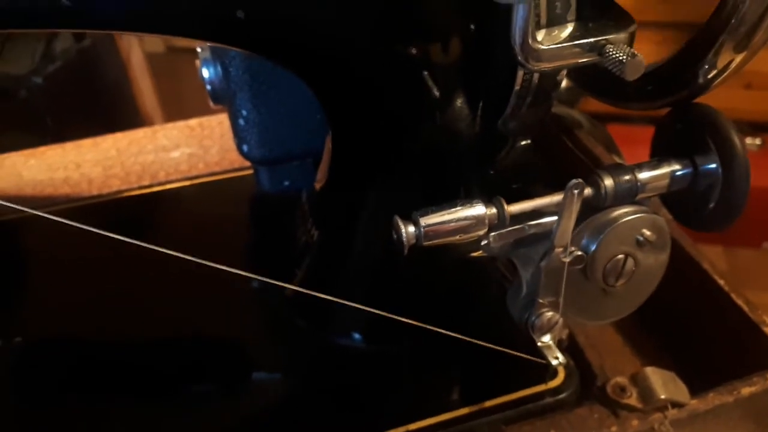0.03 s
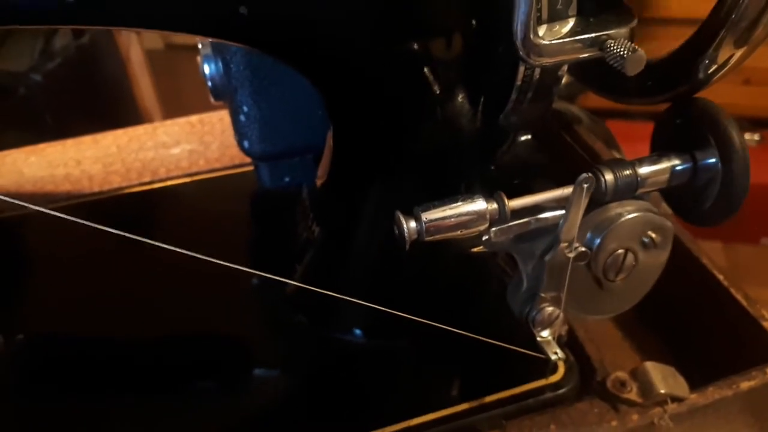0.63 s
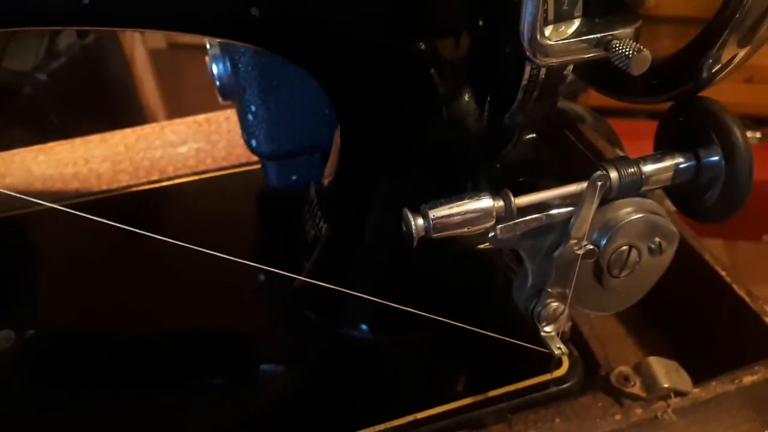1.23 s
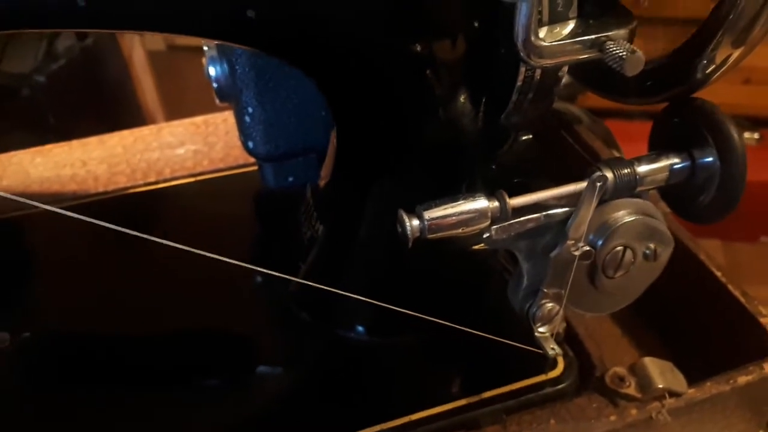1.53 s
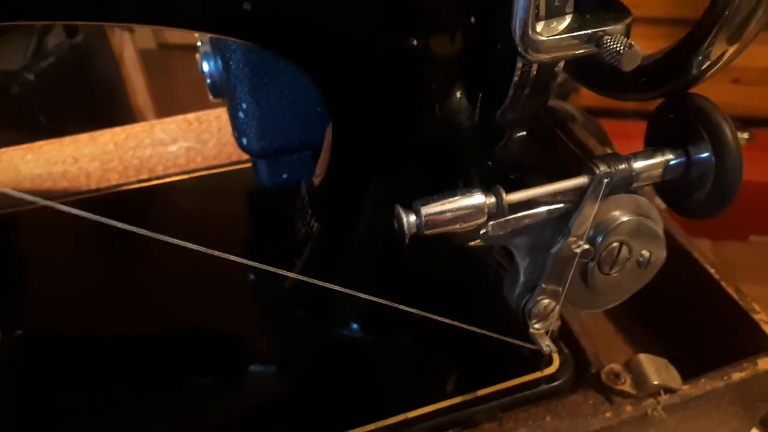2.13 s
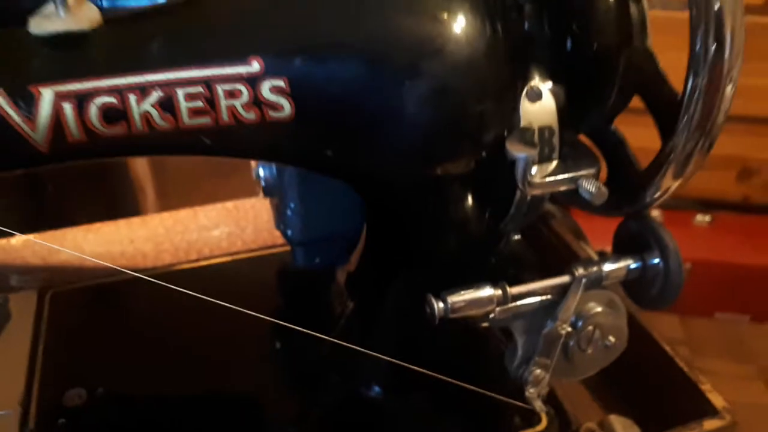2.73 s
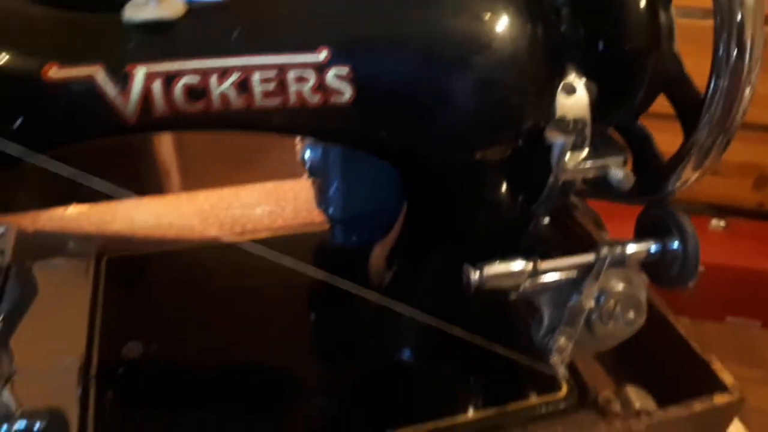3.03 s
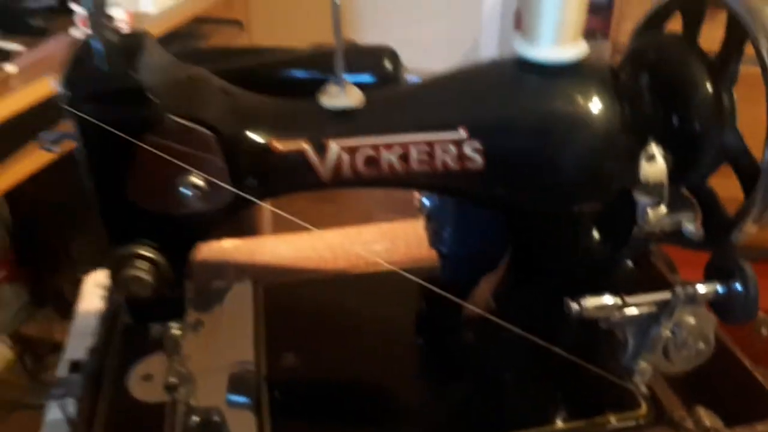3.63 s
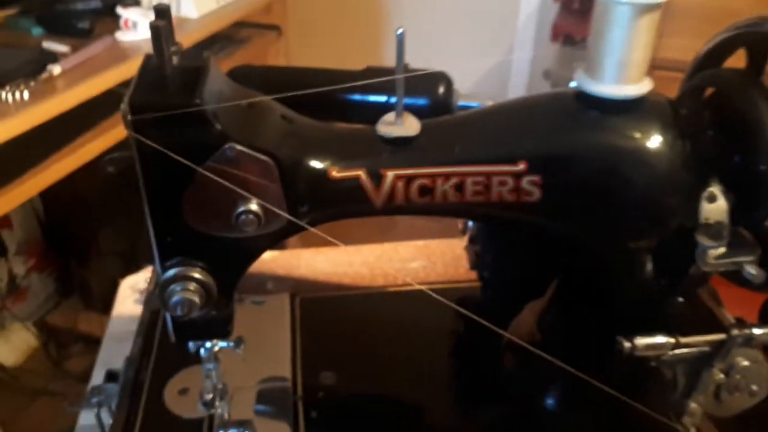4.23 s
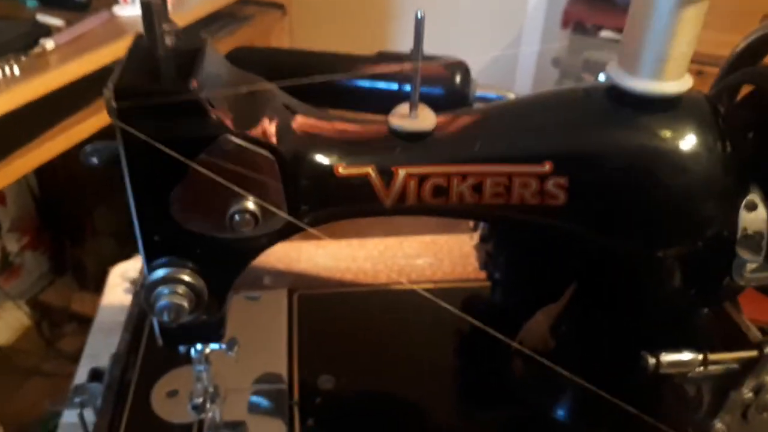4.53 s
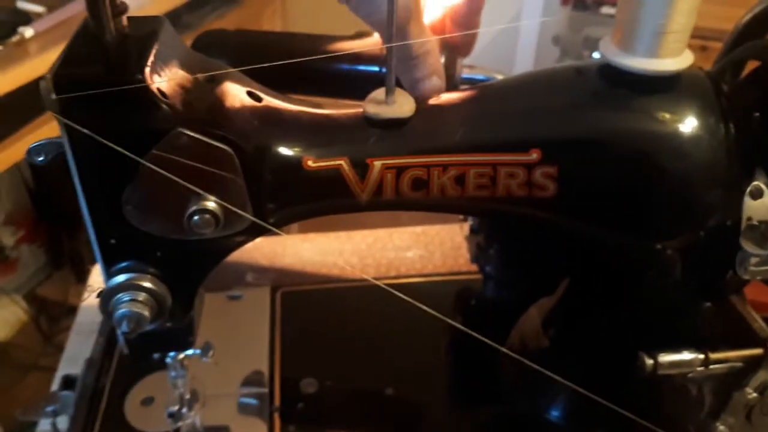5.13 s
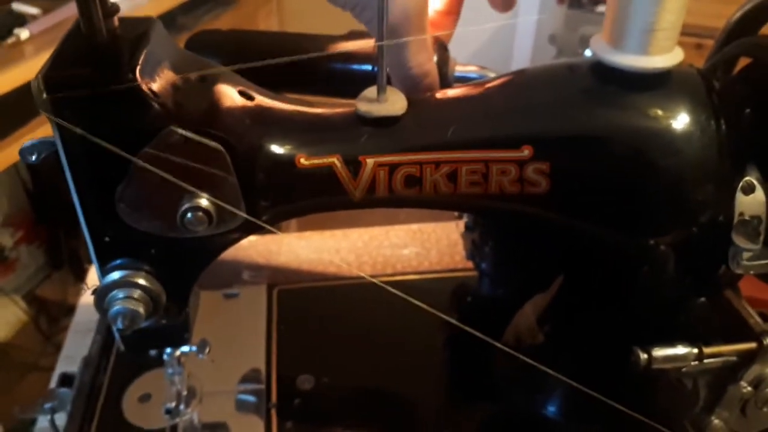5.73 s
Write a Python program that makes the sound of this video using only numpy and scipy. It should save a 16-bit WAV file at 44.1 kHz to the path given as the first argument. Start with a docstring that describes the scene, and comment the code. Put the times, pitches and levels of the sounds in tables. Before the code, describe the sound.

From the start, a hand-cranked sewing machine is winding a bobbin, loud and close, slightly to the left. Its gears whirr with dense, fine ticking, loose links snap and rattle, and a steel part clacks about three times a second. Beneath this, the wooden base rumbles and drones with each turn. At about 2.5 seconds the mechanism stops, and a metal part drops into place with a clink and one small bounce. The rest is much quieter and a little further off. A light tick comes near 3.2 seconds, a hard knock at 3.4, and a hollow knock with a brief low ring around 3.75. Faint handling ticks follow between 4.5 and 4.7 seconds, then two sharper little clicks near 5.1 and 5.4. The small room's soft hush and low hum continue until the end, at around six seconds.

```python
"""First comes the whirr and rattle of a hand-cranked sewing machine winding a bobbin close by.
Gear teeth tick into the metal body, loose links snap against their stops, a steel part clacks
once a turn and the wooden base drones. After about 2.5 seconds it stops with a clink.
A few knocks and small handling ticks follow in a small, quiet room with a low hum."""
import sys
import numpy as np
from scipy import signal
from scipy.fft import rfft, irfft, next_fast_len
from scipy.io import wavfile
from scipy.ndimage import uniform_filter1d, map_coordinates

SR = 44100
rng = np.random.default_rng(int(sys.argv[2]) if len(sys.argv) > 2 else 0)


def materialize(psi):
    """Save the field psi as 16-bit PCM at rate SR to the path in sys.argv[1].

    A 1-D psi becomes a single channel; in a 2-D psi each row is a channel.
    """
    bounded = np.clip(np.atleast_2d(psi).T, -1, 1)
    quanta = np.round(bounded * 32767).astype(np.int16)
    wavfile.write(sys.argv[1], SR, quanta)


N = 254456
NOW = np.arange(N) / SR  # seconds
TOP_HZ = 15850


def amp(db):
    """Turn decibels (dB) into a gain. A fade time, t60, is the seconds taken to fall 60 dB."""
    return 10 ** (np.asarray(db) / 20)


def unit(x):
    """Scale to an average power of 1."""
    return x / np.sqrt(np.mean(np.abs(x) ** 2) + 1e-20)


def along(points, hz):
    """Read between (Hz, value) points on a log frequency axis."""
    f, values = np.transpose(points)
    return np.interp(np.log(hz + 1), np.log(f + 1), values)


def curve(points):
    """Join (seconds, value) points into one value per sample."""
    return np.interp(NOW, *np.transpose(points))


def wobble(rate):
    """A smooth curve through `rate` random values a second."""
    return map_coordinates(rng.standard_normal(int(N * rate / SR) + 4), [NOW * rate])


def grid():
    """The frequencies that all filters share."""
    return np.fft.rfftfreq(2 * next_fast_len(N // 2 + SR // 4), 1 / SR)


def filtered(x, response):
    """Pass x through a filter given on the frequency grid."""
    size = 2 * (response.shape[-1] - 1)
    return irfft(rfft(x, size) * response)[..., :N]


def colour(spectrum):
    """A filter shaped by (Hz, dB) points."""
    cepstrum = irfft(np.log(amp(along(spectrum, grid())) + 1e-6))
    half = len(cepstrum) // 2
    cepstrum[1:half] *= 2  # folded forward, so nothing sounds before the hit
    cepstrum[half + 1:] = 0
    return unit(np.exp(rfft(cepstrum)))


def resonances(modes):
    """A filter that rings at (Hz, width in Hz, dB) modes; small bodies give off no deep bass."""
    f = grid()
    peaks = sum((-1) ** k * amp(db) * width / (hz * hz - f * f + 1j * f * width)
                for k, (hz, width, db) in enumerate(modes))
    bass_cut = (1j * f / (1j * f + 100)) ** 3
    return unit(1j * f * peaks * bass_cut)


def noise():
    """Two unrelated white noises."""
    return rng.standard_normal((2, N))


def burst(t60, rise=0.00014):
    """The short scrape of one contact."""
    t = np.arange(SR // 3) / SR
    return rng.standard_normal((2, len(t))) * amp(-60 * t / t60) * (1 - np.exp(-t / rise))


def ring(modes):
    """Struck metal: each blow shares its strength a little differently among the tones."""
    t = np.arange(SR // 2) / SR
    tones = 0
    for hz, db, t60 in modes:
        fade = amp(db + rng.uniform(-2, 2) - 60 * t / t60)
        tones += fade * np.sin(2 * np.pi * (hz * t + rng.random((2, 1))))
    return tones * (1 - np.exp(-t / 0.00021))


def waver(hz, spread_hz, depth_db):
    """A low resonance kept going by uneven shaking: its pitch and level stray."""
    phase = 2 * np.pi * np.cumsum(hz + spread_hz * wobble(45)) / SR
    return unit(amp(depth_db * wobble(40)) * np.sin(phase))


def add(track, s, sound):
    """Mix a sound in at s seconds."""
    start = max(round(s * SR), 0)
    track[:, start:start + sound.shape[1]] += sound[:, :N - start]


# How long the room echoes. Each row: frequency in Hz, fade time in seconds.
ROOM_FADE = [(150, 0.32), (1000, 0.2), (4000, 0.24), (14000, 0.14)]

def room(x, wet_db):
    """The direct sound plus the walls' short, diffuse echo."""
    echo = np.zeros((2, N))
    step = SR // 4  # a new random echo every quarter second
    for start in range(0, N, step):
        part = x[:, start:start + step]
        if np.abs(part).max() > 1e-5:
            hz, t, bands = signal.stft(rng.standard_normal((2, SR // 3)), SR, nperseg=256)
            fade = amp(-60 * t / along(ROOM_FADE, hz)[:, None]) * (1 - np.exp(-t / 0.0036))
            tail = signal.istft(bands * fade, SR, nperseg=256)[1]
            add(echo, start / SR, signal.fftconvolve(part, tail / np.linalg.norm(tail[0]), axes=1))
    return (x + amp(wet_db) * echo) / np.hypot(1, amp(wet_db))


# How alike left and right sound. Each row: frequency in Hz, likeness from 0 to 1.
LIKENESS = [(130, 0.5), (290, 0.86), (640, 0.6), (1410, 0.06), (3100, 0)]

def stereo(pair, balance):
    """Two microphone openings: alike in the bass, the right one shaded in the treble."""
    f = grid()
    angle = np.arccos(np.clip(along(LIKENESS, f), -1, 1)) / 2
    mid, side = filtered(pair, np.array([np.cos(angle), np.sin(angle)]))
    gains = amp(along(balance, f) * np.array([[.5], [-.5]]))
    gains /= np.sqrt(np.mean(gains ** 2, axis=0))
    return filtered(np.array([mid + side, mid - side]), gains)


# Faint tones. Each row: start and hold in seconds, pitch in Hz, level in dB, fade time in seconds.
LOW_TONES = [(2.641, 0.14, 359.4, -59, 0.91), (2.85, .35, 238, -78, 0.41), (3.52, .85, 291, -77.5, 1),
             (3.84, .33, 294.6, -62, .2)]

def low_tones(rise_s=.11):
    """Faint low tones swell, hold and fade."""
    track = np.zeros(N)
    for start, held, hz, db, t60 in LOW_TONES:
        t = NOW - start
        swell = np.clip(t / rise_s, 0, 1) * amp(db - 60 * np.maximum(t - held, 0) / t60)
        track += np.sqrt(2) * swell * np.sin(2 * np.pi * hz * t)
    return track


# The hush of the room. Each row: frequency in Hz, relative level in dB.
AIR_COLOUR = [(15, -37), (28, -25), (60, -12), (90, -9.5), (125, -3), (180, -10.5), (260, -17.5),
              (400, -16.5), (660, -20), (900, -23), (2760, -30), (4500, -33.5), (10000, -37), (15500, -32)]

def background():
    """Room air, faint tones and a wavering low hum that recedes."""
    hum = amp(curve([(3.3, -69), (5.7, -72)])) * waver(hz=119.5, spread_hz=3, depth_db=3.5)
    air = stereo(filtered(noise(), colour(AIR_COLOUR)), balance=[(100, 1), (10000, 1.5)])
    return low_tones() + hum + amp(-67.5) * air


# Handling ticks. Each row: start in seconds, level in dB, pitch in Hz, width in octaves,
# rise and fade times in seconds.
TOUCHES = [(3.149, -60, 2800, 0.5, 0.004, 0.046), (3.25, -38.5, 3770, 0.6, 0.0041, 0.049),
           (4.481, -65.5, 375, 0.11, 0.0066, 0.18), (4.56, -51, 66, 0.3, 0.004, 0.069),
           (4.616, -63, 2030, 0.92, 0.0016, 0.06), (4.669, -53.5, 1980, 0.17, 0.023, 0.25),
           (4.724, -51, 4820, 0.63, 0.00091, 0.039), (5.03, -66, 3200, 0.66, 0.0018, .05),
           (5.126, -39.5, 4240, 0.6, 0.00064, 0.036), (5.128, -63, 1050, 0.32, .001, 0.047),
           (5.35, -54.5, 1190, 1, 0.0047, 0.085), (5.37, -37, 1960, 0.44, 0.00068, 0.014)]

def ticks():
    """Light touches on thread and fittings, each with one broad resonance, heard mostly off the walls."""
    track = np.zeros((2, N))
    for s, db, hz, octaves, rise, t60 in TOUCHES:
        touch = rfft(burst(t60, rise))
        off_pitch = np.log2(np.linspace(1, SR / 2, touch.shape[1]) / hz) / octaves
        peak = unit(1 / (1 + off_pitch ** 2))
        add(track, s, amp(db) * irfft(touch * peak)[:, :SR // 4])
    return room(track, wet_db=7.5)


# Knocks on machine and case. Each row: start in seconds, crack and thump in dB, fade time in seconds.
KNOCK_HITS = [(3.4402, -30.5, -37, 0.0374), (3.452, -33.5, -51, 0.023), (3.695, -46.5, -45.5, 0.13),
              (3.749, -39.5, -30.5, 0.046), (3.768, -53.5, -44, 0.064)]
# The crack of a knock. Each row: frequency in Hz, relative level in dB.
CRACK_COLOUR = [(150, -29), (250, -15), (400, -17), (550, -12.5), (780, -15.5), (1180, -16.5), (1700, -12),
                (2000, -16), (3300, -23), (4700, -21.5), (5500, -25.5), (8200, -20), (10500, -27),
                (15500, -23.5)]
# The hollow wooden case. Each row: pitch in Hz, width in Hz, relative level in dB.
CASE_MODES = [(155, 20, 9.5), (232, 75, -5), (313, 46, -4), (454, 19, -3.5), (530, 44, -8), (775, 61, -10)]

def knocks():
    """Hard knocks with a hollow thump from the case; the heaviest leaves a low ring."""
    cracks, thumps, rings = np.zeros((3, 2, N))
    for s, db, thump_db, t60 in KNOCK_HITS:
        add(cracks, s, amp(db + 4) * burst(t60, rise=0.0013))
        add(thumps, s, amp(thump_db) * burst(t60))
    add(rings, 3.752, ring([(235, -46.5, 0.96), (4544, -54, .25)]))
    cracks = room(filtered(cracks, colour(CRACK_COLOUR)), wet_db=6.5)
    thumps = room(filtered(thumps, resonances(CASE_MODES)), wet_db=-1.5)
    return cracks + thumps + rings


# The ring of the falling part. Each row: pitch in Hz, relative level in dB, fade time in seconds.
CLINK_TONES = [(910, 3.5, 0.13), (1015, -16, 0.19), (1287, 1, 0.19), (2430, -13, 0.18), (2420, -2, 0.15),
               (3120, -10, 0.26), (4060, -3.5, 0.16), (4380, -9, 0.15), (5170, -11, 0.22), (5960, -15, .16)]
# The noise of its landing. Each row: frequency in Hz, relative level in dB.
LANDING_COLOUR = [(350, -16), (600, -19), (869, -8.5), (970, -1), (1070, -4.5), (1680, -17), (2370, -8.5),
                  (2610, -18.5), (4220, -12.5), (4780, -21.5), (5190, -20.5), (14900, -31.5),
                  (16000, -44.5)]

def clink():
    """A metal part drops into place as the wheel comes to rest, and bounces once."""
    contact, metal = np.zeros((2, 2, N))
    for s, db in [(2.492, -30), (2.524, -37)]:
        add(contact, s, amp(db) * burst(t60=0.061))
        add(metal, s, amp(db - 9.5) * ring(CLINK_TONES))
    return room(filtered(contact, colour(LANDING_COLOUR)), wet_db=8.5) + metal


# Turns of the crank, the first already under way. Each row: start in seconds, then clack, thud, steel
# ring, jingle, link rattle and base shaking in dB, then the links' delay at mid-turn in seconds.
CRANK_TURNS = [(-.19, -21, -29, -36, -47, -2, -1, 0.0004), (.127, -21, -26, -29, -46, -2, -1.5, -0.0036),
               (0.4492, -20, -35, -37, -50.5, 0.5, -0.5, -0.0016),
               (0.7619, -21.5, -26, -36.5, -55, -1.5, -1.5, -.003),
               (1.0815, -19.5, -31.5, -36.5, -60.5, -1.5, -1, 0.0041),
               (1.3975, -19, -29.5, -31, -45, -1, 1, 0.00039),
               (1.707, -16.5, -30.5, -37.5, -50, 1, -1, .003),
               (2.0161, -20.5, -25.5, -33.5, -38, -2.5, -1.5, -0.015),
               (2.354, -22.5, -38, -43, -42, -8, -0.5, 0.0072)]
# The load through one turn. Each row: fraction of the turn, then whirr, rumble and drone in dB.
TURN_LOAD = [(0, 2.5, -53.5, -53), (.16, 2.5, -52.5, -50.5), (.27, -6, -61, -45.5), (.39, -1.5, -66, -49.5),
             (.46, -2, -59.5, -59.5), (.59, 2.5, -52, -43), (.72, -1, -50.5, -56.5),
             (.8, -1.5, -48.5, -42.5), (.92, -2, -47.5, -50)]
LAST_TURN_S, STOP_S = .31, 2.44  # pace of the unfinished last turn; when the wheel is stopped
TURN_LENGTHS = np.append(np.diff([row[0] for row in CRANK_TURNS]), LAST_TURN_S)

def crank_load():
    """Whirr, rumble and drone in dB follow the crank; the hand shakes the base more in some turns."""
    starts, *_, shake_db, _ = np.transpose(CRANK_TURNS)
    turn = np.searchsorted(starts, NOW) - 1
    position = (NOW - starts[turn]) / TURN_LENGTHS[turn]
    fraction, *levels = np.transpose(TURN_LOAD)
    whirr_db, rumble_db, drone_db = [np.interp(position, fraction, db, period=1) for db in levels]
    shaking_db = uniform_filter1d(shake_db[turn], size=SR // 20)
    return whirr_db, rumble_db + shaking_db, drone_db + 0.3 * shaking_db


def wooden_base(t60=0.37):
    """The shaken base rumbles and drones with each turn, then dies away after the stop."""
    _, rumble_db, drone_db = crank_load()
    fade = amp(-60 * np.maximum(NOW - STOP_S, 0) / t60)
    rumble = amp(rumble_db - 1) * waver(hz=108.7, spread_hz=8.2, depth_db=2.5)
    drone = amp(drone_db + .5) * waver(hz=177.4, spread_hz=9.8, depth_db=4)
    return fade * (rumble + drone)


def grit(per_second, hz):
    """Tiny steel ticks a few cycles long, each at its own pitch and size."""
    t = np.arange(SR // 200) / SR
    track = np.zeros((2, N))
    for when, pitch, softness in rng.random((int(per_second * N / SR), 3)):
        f = min(hz * 2 ** (1.4 * (pitch - .5)), TOP_HZ)
        tick = np.sin(2 * np.pi * (f * t + rng.random((2, 1)))) * np.exp(-t * f / 4)
        add(track, when * N / SR, amp(-16 * softness) * tick)
    return unit(track)


# How loudly the gears run. Each row: time in seconds, level in dB.
GEAR_LEVEL = [(0, -42.5), (1.3, -43), (1.6, -43), (2.12, -42), (2.35, -46), (2.47, -42.5)]
# The whirr of the gears. Each row: frequency in Hz, relative level in dB.
WHIRR_COLOUR = [(120, -27.5), (210, -4.5), (330, -8), (635, -11.5), (803, -9), (1110, -13), (1220, -10),
                (2300, -18), (4580, -18), (5590, -34), (6010, -31.5), (6700, -30.5), (8180, -20.5),
                (8960, -32), (16000, -23)]
# The metal body and its base. Each row: pitch in Hz, width in Hz, relative level in dB.
BODY_MODES = [(288, 18, -1.5), (390.2, 8, 5), (506.7, 27, 2), (706.6, 32, 4), (744.5, 69, 2),
              (804.4, 63, 3.5), (951, 32, -3), (1018, 27, -4), (1240, 75, -10), (1511, 41, -6),
              (1930, 26, -8), (2560, 950, -19), (3800, 330, -15)]
# The winder's small jingling parts. Each row: pitch in Hz, width in Hz, relative level in dB.
JINGLE_MODES = [(3450, 24, 3), (4540, 52, 7), (4550, 110, -3), (5964, 90, 5), (7440, 210, -9.5),
                (7950, 120, -11), (10610, 87, -4), (12780, 200, -2.5)]

def gears(ticks_per_second=260):
    """Teeth tick densely and unevenly into the metal body, harder while the turn is under load."""
    load_db = crank_load()[0]
    turning = np.interp(NOW, [2.425, 2.475], [1, 0]) * amp(curve(GEAR_LEVEL))
    hits = rng.random(N) < ticks_per_second / SR
    teeth = hits * amp(1.7 * np.clip(rng.standard_normal(N), -2, 1))
    tooth_fade = amp(-60 * np.arange(SR // 20) / SR / 0.013)
    chatter = unit(signal.fftconvolve(teeth, tooth_fade)[:N])
    whirr = amp(-3.5) * filtered(noise() * (chatter + 1.02), colour(WHIRR_COLOUR))
    jingle = amp(-11.5) * filtered(noise() * chatter, resonances(JINGLE_MODES))
    body = amp(-5) * filtered(noise() * chatter, resonances(BODY_MODES))
    sparkle = amp(-11.5) * grit(per_second=85, hz=10000)
    return turning * (amp(load_db) * (whirr + jingle + sparkle) + amp(.5 * load_db) * body)


# Where loose links hit their stops. Each row: fraction of the turn, snap in dB, thud in dB.
LINK_HITS = [(.122, -22.5, -37.5), (.225, -53, -40), (.415, -32.5, -42), (.466, -34, -31.5),
             (.497, -22.5, -45.5), (.557, -22.5, -48.5), (.621, -20.5, -39), (.733, -22.5, -30),
             (.795, -32.5, -28), (.966, -21.5, -29)]

def link_contacts(scatter_s=.001, scatter_db=2.68):
    """List (seconds, snap dB, thud dB) for each link hit until the stop; no two turns are alike."""
    contacts = []
    for (start, *_, rattle_db, shake_db, lag), length in zip(CRANK_TURNS, TURN_LENGTHS):
        for fraction, snap_db, thud_db in LINK_HITS:
            s = start + fraction * length + lag * np.sin(np.pi * fraction)
            s += scatter_s * rng.standard_normal()
            chance_db = scatter_db * rng.standard_normal()
            contacts.append((s, snap_db + rattle_db + chance_db, thud_db + shake_db + chance_db))
    return [row for row in contacts if 0 < row[0] < STOP_S]


# Jolts where a link catches hard. Each row: start in seconds, snap in dB, thud in dB.
LINK_JOLTS = [(.277, -30, -31.5), (.697, -40, -27.5), (.833, -34, -27.5), (1.316, -25, -27),
              (1.334, -20.5, -26.5), (1.627, -22.5, -32.5), (1.9005, -20, -31), (1.939, -24, -30),
              (2.252, -27.5, -33.5), (2.272, -30, -27)]
# The snap of a link. Each row: frequency in Hz, relative level in dB.
SNAP_COLOUR = [(290, -33), (500, -10), (649, -7), (708, -2), (1020, -14.5), (1090, -22), (1190, -6.5),
               (1690, -9.5), (1930, -7.5), (3490, -12.5), (3920, -24), (4530, -13.5), (6700, -22),
               (14700, -15.5), (16000, -23.5)]

def rattle():
    """Each loose link snaps against its stop, bounces and thuds in the metal body."""
    snaps, thuds = np.zeros((2, 2, N))
    for s, db, thud_db in link_contacts() + LINK_JOLTS:
        add(snaps, s, amp(db - 7.5) * burst(t60=0.034, rise=0.00058))
        add(snaps, s + rng.uniform(.004, .01), amp(db - 11.5) * burst(t60=0.032))  # the bounce
        add(thuds, s, amp(thud_db + 3.5) * burst(t60=0.028, rise=0.001))
    return filtered(snaps, colour(SNAP_COLOUR)) + filtered(thuds, resonances(BODY_MODES))


# The ring of the steel part. Each row: pitch in Hz, relative level in dB, fade time in seconds.
STEEL_TONES = [(4470, 4.5, 0.086), (10320, 0.5, 0.068), (11900, -14.5, 0.085), (13000, -10, 0.074),
               (13630, -5.5, 0.085), (15080, -11, .07)]
# The blow of a clack. Each row: frequency in Hz, relative level in dB.
CLACK_COLOUR = [(50, -41.5), (150, -3.5), (250, -25.5), (875, -2), (1220, -13), (3170, -21.5), (4120, -17),
                (4490, -10), (6700, -23.5), (9490, -24.5), (10200, -16.5), (11100, -21.5), (12800, -11),
                (16000, -17.5)]

def clacks():
    """Once a turn the drive reverses hard: the body thuds, a steel part rings and small parts jingle."""
    blows, thuds, steel, shakes = np.zeros((4, 2, N))
    for s, db, thud_db, ring_db, jingle_db, *_ in CRANK_TURNS[1:]:
        add(blows, s, amp(db - 1.5) * burst(t60=0.041, rise=0.0006))
        add(thuds, s, amp(thud_db + 2.5) * burst(t60=0.038))
        add(steel, s + .001, amp(ring_db + .5) * ring(STEEL_TONES))
        add(shakes, s, amp(jingle_db + 4.5) * burst(t60=0.28, rise=.01))
    body = filtered(thuds, resonances(BODY_MODES))
    jingle = filtered(shakes, resonances(JINGLE_MODES))
    return filtered(blows, colour(CLACK_COLOUR)) + body + jingle + steel


# Stereo balance close by and further off. Each row: frequency in Hz, left minus right in dB.
NEAR_BALANCE = [(100, 0.5), (350, 1.5), (520, 6), (780, 6.5), (950, 0), (2000, 1.5), (4500, 5), (6500, 0.5),
                (8500, 22.5), (11000, 19), (13000, 13.5), (15500, 19)]
FAR_BALANCE = [(200, 2), (4000, -1), (10000, 15.5)]

def scene():
    """The machine close by, the later small sounds further off."""
    machine = stereo(room(gears() + rattle() + clacks(), wet_db=-11), NEAR_BALANCE)
    base = amp([[.8], [-.8]]) * wooden_base()  # a little to the left
    small_sounds = stereo(clink() + knocks() + ticks(), FAR_BALANCE)
    return machine + base + small_sounds + background()


def record(dry):
    """Cut away the treble above TOP_HZ."""
    return filtered(dry, 1.0 * (grid() < TOP_HZ))


dry = scene()
out = record(dry)
materialize(out)
```